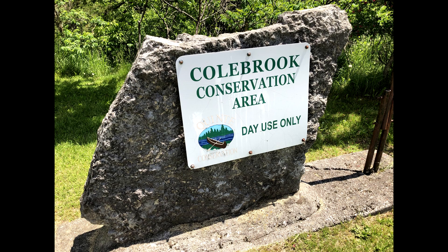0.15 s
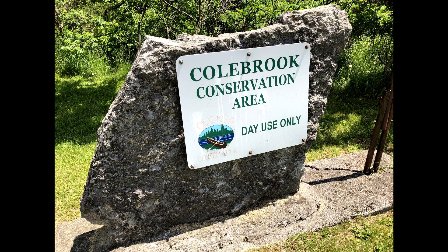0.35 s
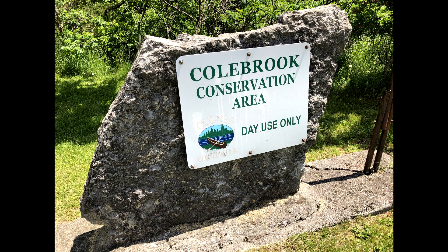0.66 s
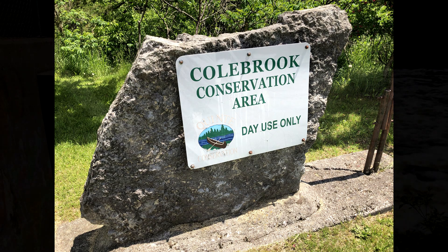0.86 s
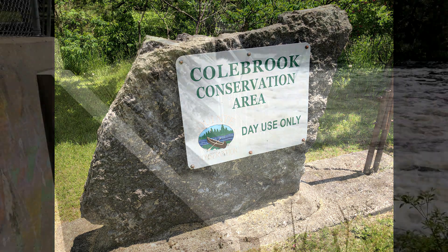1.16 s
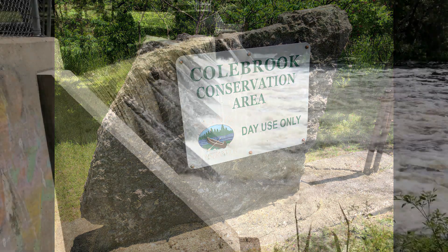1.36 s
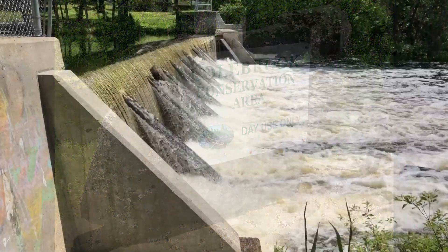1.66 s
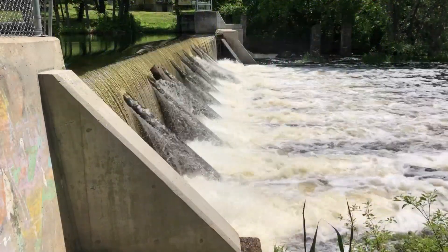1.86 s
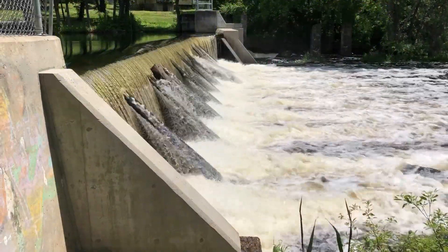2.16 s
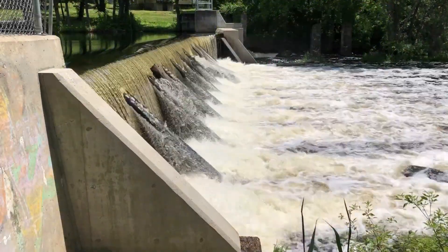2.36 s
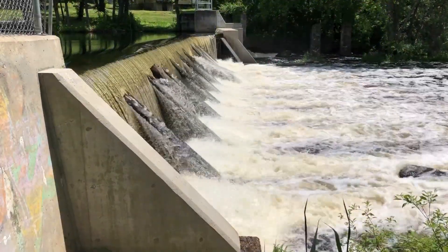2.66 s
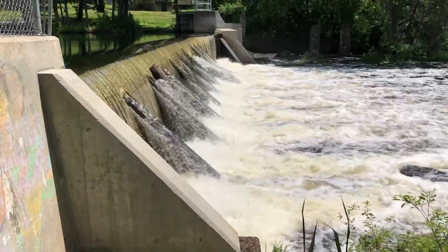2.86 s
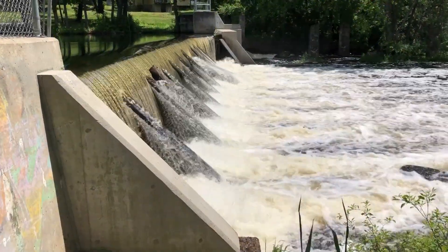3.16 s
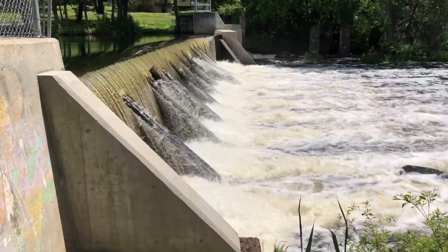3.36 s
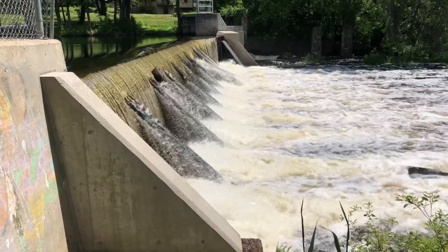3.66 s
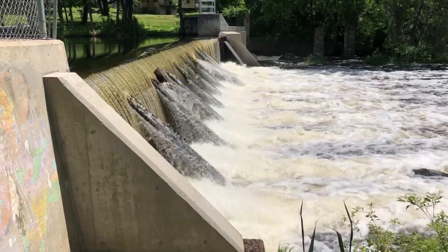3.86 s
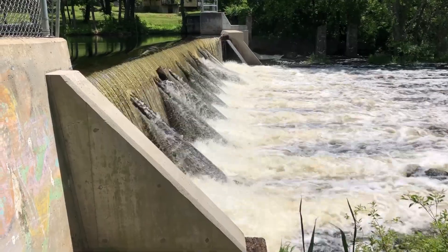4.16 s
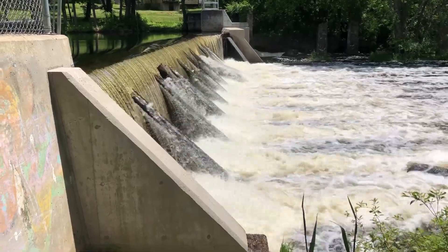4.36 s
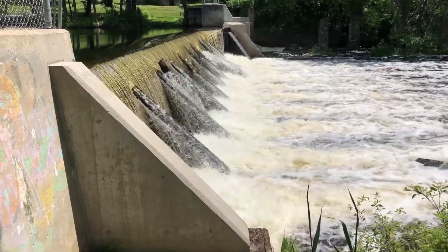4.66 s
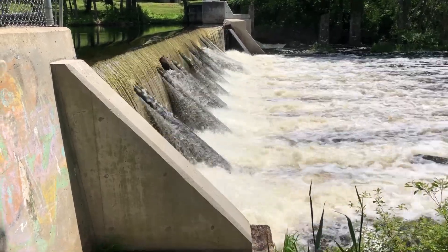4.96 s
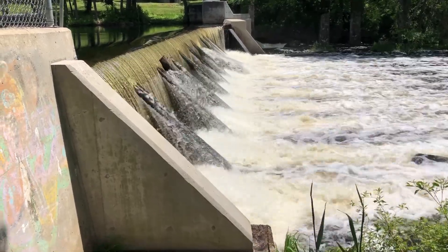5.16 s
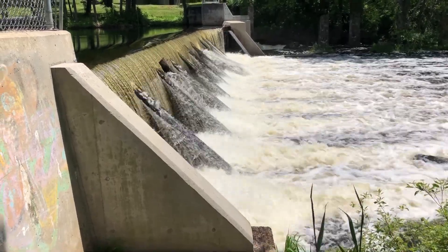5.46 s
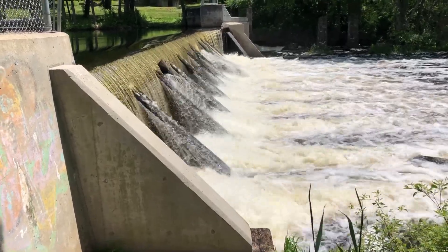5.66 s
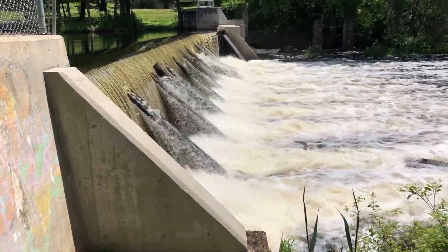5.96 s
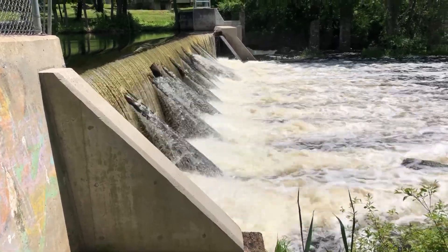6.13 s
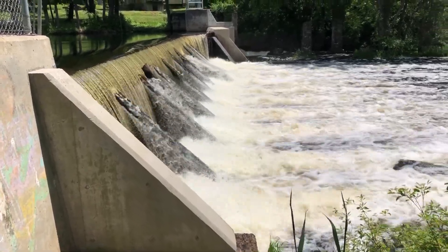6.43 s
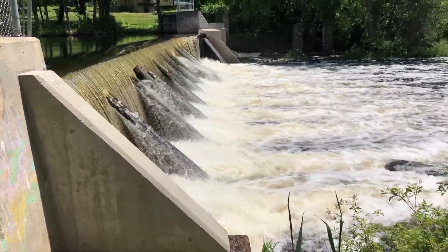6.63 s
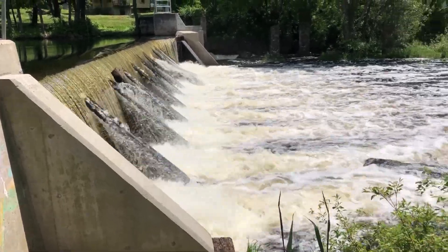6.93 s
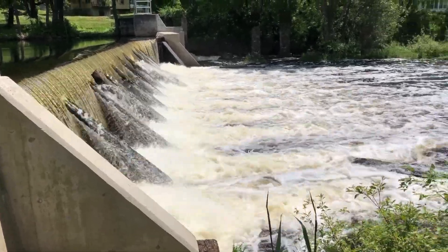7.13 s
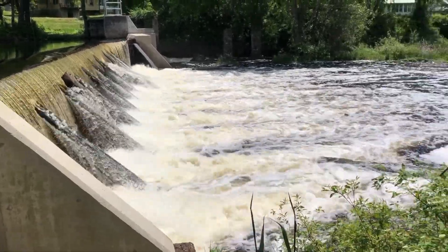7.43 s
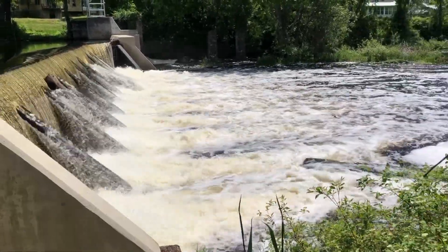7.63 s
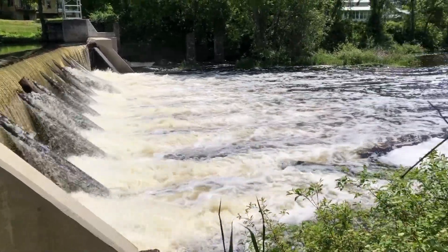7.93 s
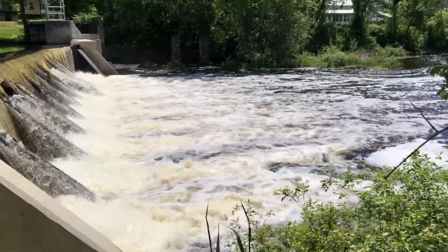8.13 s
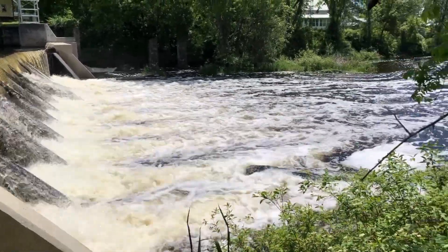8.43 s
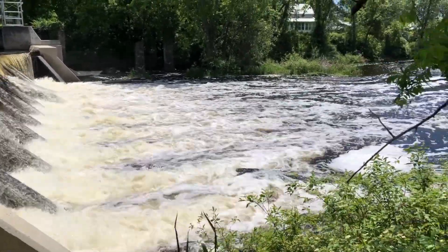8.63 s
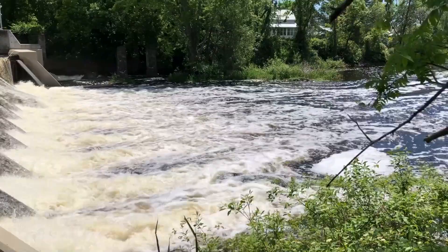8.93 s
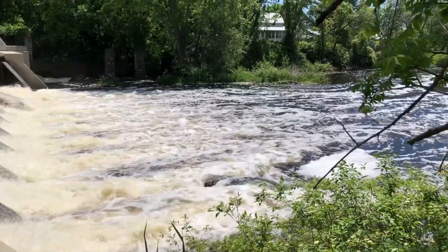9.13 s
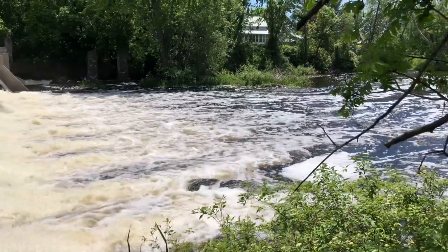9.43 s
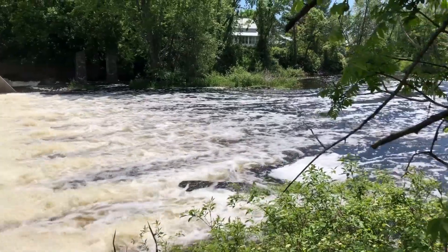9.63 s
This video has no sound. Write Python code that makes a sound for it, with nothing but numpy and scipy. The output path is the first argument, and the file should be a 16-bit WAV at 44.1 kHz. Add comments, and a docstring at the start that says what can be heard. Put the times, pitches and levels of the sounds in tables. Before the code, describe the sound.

Just over half a second of silence, then a river pouring over a low concrete dam fades in smoothly to a constant roar. A low hollow rumble sits under broad bubbling white water and crisp spray hiss with fine drop patter. One microphone on the open bank, the same in both channels, slowly turns downstream near the end, slightly softening and recolouring the rush.

```python
"""A river pours over a low concrete dam, taken from the bank beside the wing wall with one microphone.
After a short silence the rush fades in: the plunging sheet is noise that rumbles in standing waves,
the white water is noise and ringing bubbles, and the spray is hiss with a patter of drops.
In the last few seconds the microphone turns downstream, which shifts the colour and lowers the level."""
import sys
import numpy as np
from scipy import signal
from scipy.fft import rfft, irfft
from scipy.io import wavfile

SR = 44100
rng = np.random.default_rng(int(sys.argv[2]) if len(sys.argv) > 2 else 0)


def dump_mix(stems):
    """Bounce the given channels to the path in sys.argv[1] as a 16-bit WAV at rate SR."""
    frames = np.atleast_2d(stems).T  # one column per channel
    limited = np.clip(frames, -1, 1)  # hard clip at full scale
    pcm = np.round(limited * 32767).astype(np.int16)
    wavfile.write(sys.argv[1], SR, pcm)


N = 431738
TIME = np.arange(N) / SR  # s
ALL_HZ = np.fft.rfftfreq(N, 1 / SR)

# short-time frames: length and step in samples, then the time and frequency axes
SIZE, HOP = 512, 128
FRAME_S = np.arange(N // HOP + 5) * HOP / SR
BIN_HZ = np.fft.rfftfreq(SIZE, 1 / SR)


def gain_of(db):
    """Decibels to amplitude."""
    return 10 ** (np.asarray(db) / 20)


def evened(x):
    """Scales to rms 1."""
    return x / np.sqrt(np.mean(x ** 2) + 1e-20)


def read(points, hz):
    """Reads a curve of (f, level) points on a log-frequency axis."""
    f, level = np.transpose(points)
    return np.interp(np.log(hz + 1), np.log(f + 1), level)


def coloured(x, points):
    """Filters a sound by a curve of levels, then scales to rms 1."""
    spectrum = rfft(x) * gain_of(read(points, ALL_HZ))
    return evened(irfft(spectrum, N))


def patches(length_s, width_hz):
    """A random field over frequency and time, rms 1, correlated over the given width and length."""
    field = rng.standard_normal((len(BIN_HZ), len(FRAME_S)))
    steps = [BIN_HZ[1] / width_hz, FRAME_S[1] / length_s]
    for axis, step in enumerate(steps):
        keep = np.exp(-step)
        fresh = np.sqrt(1 - keep ** 2)
        start = keep * np.take(field, [0], axis)
        field = signal.lfilter([fresh], [1, -keep], field, axis, zi=start)[0]
    return evened(field)


def shaded(x, field_db):
    """Lays a field of gains over the short-time spectra of a sound."""
    overlap = SIZE - HOP
    z = signal.stft(x, nperseg=SIZE, noverlap=overlap)[2]
    z = z * gain_of(field_db[:, :z.shape[-1]])
    return signal.istft(z, nperseg=SIZE, noverlap=overlap)[1][..., :N]


def impacts(per_s, spread_db):
    """Random clicks of either sign, most of them small and a few large."""
    struck = rng.random(N) < per_s / SR
    size_db = spread_db * np.minimum(rng.exponential(1, N), 5)
    return struck * gain_of(size_db) * rng.choice([-1, 1], N)


# rms drift (dB), slowest and fastest rate (Hz)
DRIFT_DB, DRIFT_SLOW_HZ, DRIFT_FAST_HZ = 0.34, 0.816, 3.7


def level_drift(count=20):
    """A slight random drift in the level of the rumble: sines of many rates and random phases, rms 1."""
    rates = np.geomspace(DRIFT_SLOW_HZ, DRIFT_FAST_HZ, count)
    drift = np.zeros(len(FRAME_S))
    for hz in rates:
        drift += np.sin(2 * np.pi * (hz * FRAME_S + rng.random())) / np.sqrt(hz)
    return np.interp(TIME, FRAME_S, evened(drift))


# colour laid on the rumble of the falling sheet: f/Hz, relative level/dB
PLUNGE_COLOUR = [(15, -46), (23, -36), (28, -24), (36, -8), (58, -2.5), (85, -3.5), (112, 1), (155, -2),
                 (235, -1.5), (290, -6), (330, -12.5), (600, -22.5), (1500, -58)]
PLUNGE_DB = -39.5  # mean level of the rumble


def plunge(lowest_hz=22.1, echo=0.52, echo_top_hz=205):
    """The sheet hits the pool; air by the concrete rings at odd multiples of one low note."""
    bounce = echo / (1 + (ALL_HZ / echo_top_hz) ** 6)  # only long waves keep bouncing
    round_trip = np.exp(-1j * np.pi * ALL_HZ / lowest_hz)
    standing = 1 / (1 + bounce * round_trip)  # each round trip flips the sign
    ringing = irfft(rfft(rng.standard_normal(N)) * standing, N)
    rumble = coloured(ringing, PLUNGE_COLOUR)
    return rumble * gain_of(PLUNGE_DB + DRIFT_DB * level_drift())


def bubbles(per_s, spread_db, cycles, rise, count=36):
    """Bubbles of many sizes ring for a few cycles, rising in pitch as they near the surface."""
    t = np.arange(3000) / SR
    out = np.zeros(N)
    for hz in np.geomspace(350, 3500, count):
        age = t * hz / cycles  # in decay times
        bend = 1 + rise * np.minimum(age, 4)
        ring = np.exp(-age) * np.sin(2 * np.pi * hz * t * bend)
        out += signal.oaconvolve(impacts(per_s / count, spread_db), ring * hz)[:N]
    return evened(out)


# colour laid on the white water: f/Hz, relative level/dB
CHURN_COLOUR = [(100, -29), (300, -4.5), (405, -3), (445, -0.5), (630, 0), (790, -5), (970, -3.5),
                (1400, -7.5), (1580, -7.5), (2100, -14), (4000, -22.5), (12000, -50)]
CHURN_DB = -37.5  # steady level


def churn(patchy_db=1.0, bubble_db=-14):
    """White water boils below the dam: a blur of far bubbles as noise, with nearer ones ringing in it."""
    far = rng.standard_normal(N)
    near = bubbles(per_s=1500, spread_db=2.5, cycles=4.7, rise=0.018)
    boil = far + gain_of(bubble_db) * near
    boil = shaded(boil, patchy_db * patches(length_s=0.035, width_hz=300))
    return coloured(boil, CHURN_COLOUR) * gain_of(CHURN_DB)


# colour laid on the spray: f/Hz, relative level/dB
SPRAY_COLOUR = [(500, -35), (1500, -2.5), (2300, -1), (3300, 0.5), (5000, -1.06), (6300, -2.5),
                (8000, -5.5), (9700, -7), (11300, -9), (13800, -10), (16000, -11)]
SPRAY_DB = -38.5  # steady level


def spray(patchy_db=1.0, splash_db=0.13, drop_db=-7.5):
    """Mist hisses as noise, and clumps of drops patter back onto the foam as clicks."""
    drops = evened(impacts(per_s=4000, spread_db=3))
    hiss = rng.standard_normal(N) + gain_of(drop_db) * drops
    clumps_db = patchy_db * patches(length_s=0.018, width_hz=400)
    splashes_db = splash_db * patches(length_s=0.07, width_hz=6200)  # a splash lifts a wide band at once
    hiss = shaded(hiss, clumps_db + splashes_db)
    return coloured(hiss, SPRAY_COLOUR) * gain_of(SPRAY_DB)


# change of colour with the microphone fully turned downstream: f/Hz, level/dB
TURNED_COLOUR = [(300, 1), (2100, -0.3), (2650, 2.5), (3200, -0.6), (4300, -0.5), (6000, -1), (7100, 0),
                 (7800, 1.5), (9800, 1.5), (11300, 2.5), (14000, 2.5), (15500, 2)]
TURN_START_S, TURN_END_S = 6.1, 9.3
TURN_LOSS_DB = -0.84  # added to the whole curve, away from the dam


def turned_downstream(water):
    """The microphone swings at an even speed; its change in dB grows in step with the turn."""
    turn = np.clip((FRAME_S - TURN_START_S) / (TURN_END_S - TURN_START_S), 0, 1)
    change_db = read(TURNED_COLOUR, BIN_HZ) + TURN_LOSS_DB
    return shaded(water, np.outer(change_db, turn))


def scene():
    """All the water, through one microphone that slowly turns and feeds both channels."""
    water = plunge() + churn() + spray()
    heard = turned_downstream(water)
    return np.array([heard, heard])


FADE_START_S, FADE_END_S = 0.63, 2.36
EDGE_HZ = 15880  # top of the band


def record(dry):
    """A quarter-sine (equal-power) fade-in from silence, then the band limit."""
    progress = np.clip((TIME - FADE_START_S) / (FADE_END_S - FADE_START_S), 0, 1)
    faded = dry * np.sin(np.pi / 2 * progress)
    low_pass = signal.firwin(1023, EDGE_HZ, window=("kaiser", 9), fs=SR)
    return signal.oaconvolve(faded, low_pass[None], "same")


dry = scene()
out = record(dry)
dump_mix(out)
```